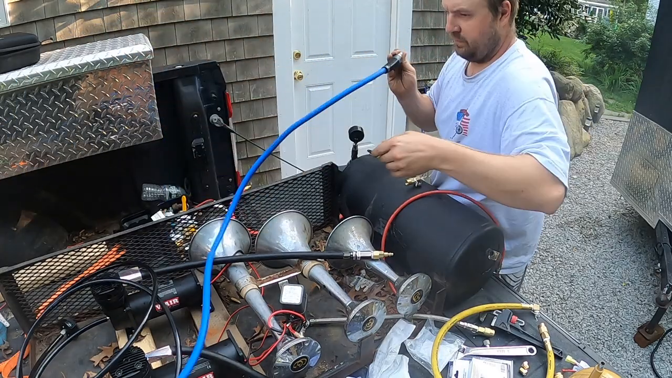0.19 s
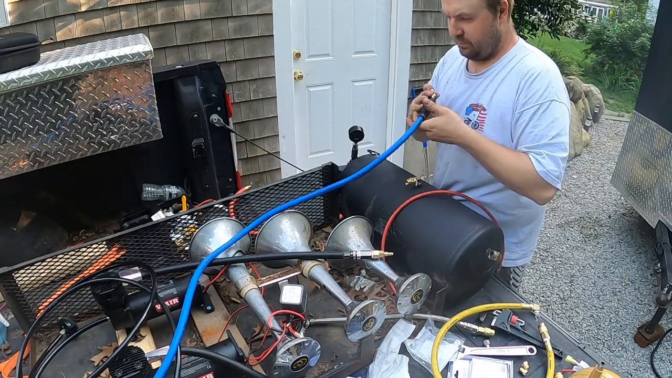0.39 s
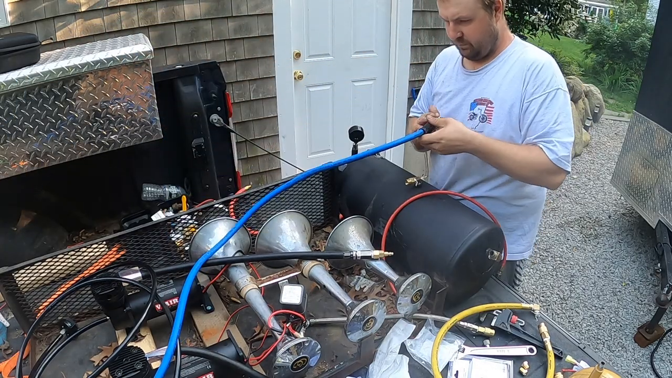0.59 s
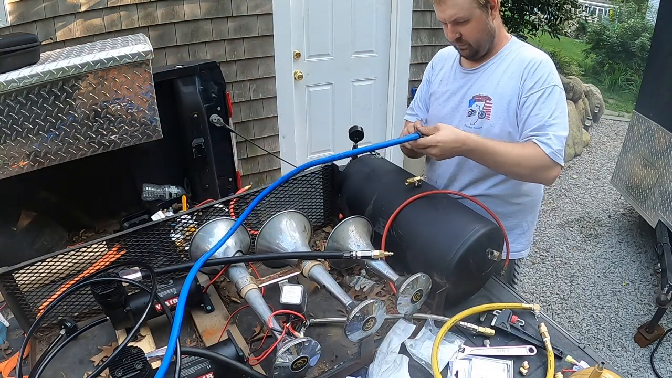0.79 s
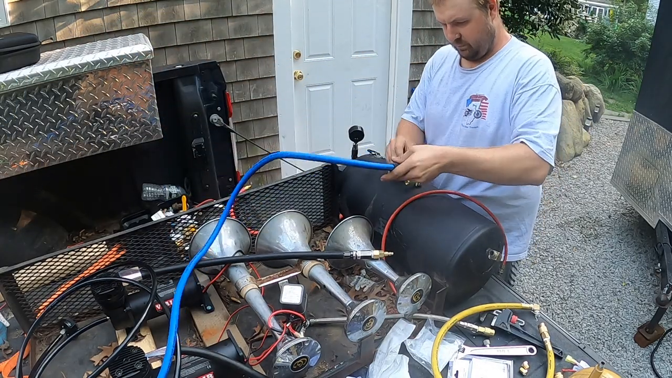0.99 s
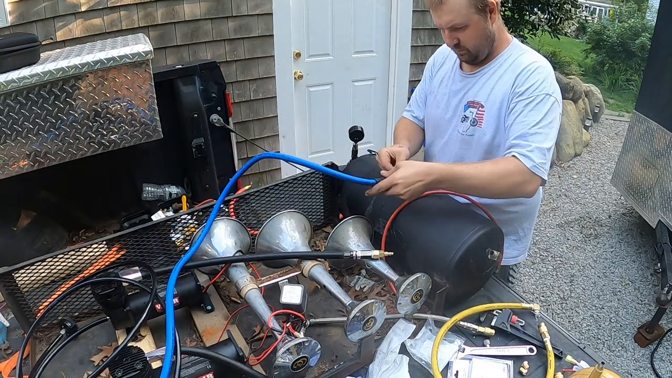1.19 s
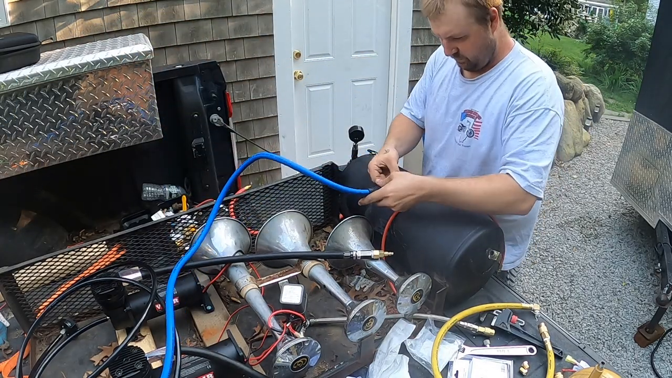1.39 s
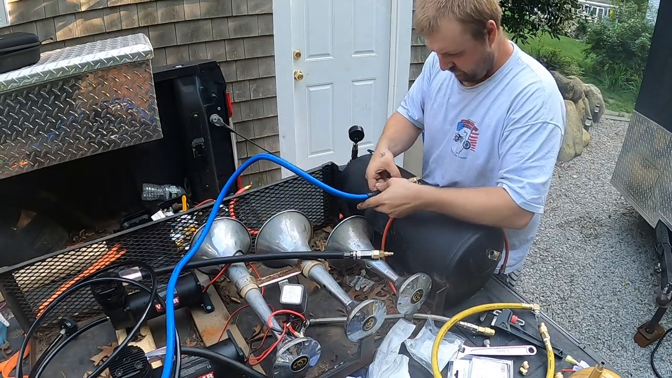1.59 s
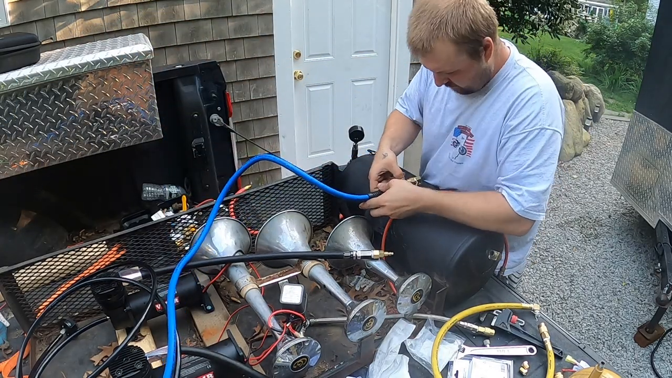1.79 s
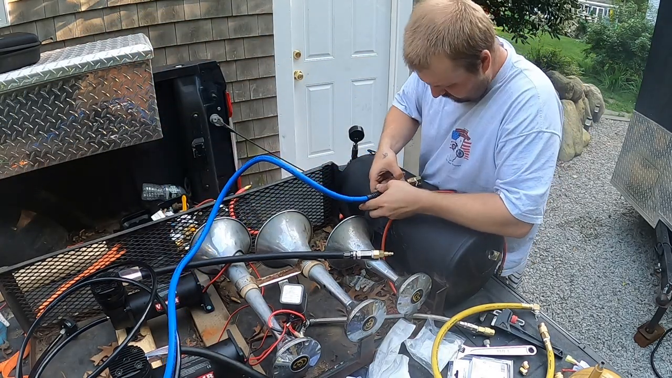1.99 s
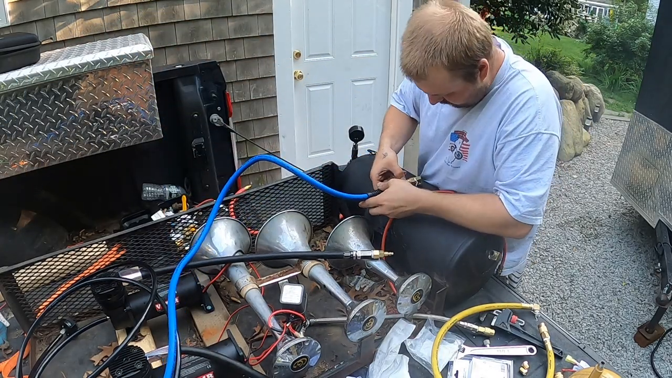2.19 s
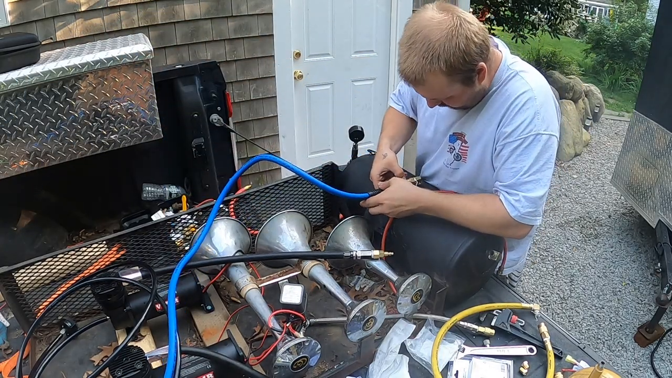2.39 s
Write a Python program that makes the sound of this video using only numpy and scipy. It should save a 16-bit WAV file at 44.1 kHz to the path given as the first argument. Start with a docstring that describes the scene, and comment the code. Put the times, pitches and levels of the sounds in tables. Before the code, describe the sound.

An air hose drops onto a truck bed, its brass fittings clattering, with one loud thump and a fading low steel hum. A coupler then clicks twice against a tank and grates briefly. Outdoors, nearby, with faint insects.

```python
"""Air hose on a truck bed

Outdoors beside a house wall, on two closely spaced microphone ports. An air hose is dragged over a
truck bed: its brass fittings clatter, it lands with a thump, and the steel hums low. The coupler clicks
twice against a steel tank, then its thread grates as it is turned. Behind it, insects and a far bird."""
import sys
import numpy as np
from scipy import signal
from scipy.fft import rfft, irfft
from scipy.io import wavfile
from scipy.ndimage import uniform_filter1d

SR = 44100
rng = np.random.default_rng(int(sys.argv[2]) if len(sys.argv) > 2 else 0)


def master(y):
    """Save y as 16-bit WAV."""
    cut = np.clip(np.atleast_2d(y).T, -1, 1)
    pcm = np.round(cut * 32767)  # scale
    wavfile.write(sys.argv[1], SR, pcm.astype(np.int16))


N = 110250
TIME = np.arange(N) / SR


# fittings bouncing on the bed (time [s], knock level [dB], tick level [dB])
BOUNCES = [(0.1991, -28.5, -26.5), (0.2042, -30.5, -27.5), (0.2101, -24.5, -21), (.2128, -20, -28.5),
           (0.2238, -28.5, -31.5), (0.2272, -15, -47), (.2365, -21.5, -44.5), (.2565, -23.5, -30),
           (.2855, -30, -39.5), (0.2942, -27.5, -33), (0.2992, -29.5, -33), (.3285, -31, -38.5),
           (0.453, -43, -54.5), (0.527, -35, -52.5), (.978, -59, -82.5)]
# spectra of the knock, the brass tick and the stirred bed (frequency [Hz], level [dB])
KNOCK_COLOUR = [(150, -24.5), (400, -6.5), (800, -3.5), (1200, -0.5), (1800, 1), (2600, -5), (3700, -3.5),
                (4600, -54.5), (8000, -48.5), (14000, -124)]
TICK_COLOUR = [(1500, -17.5), (3700, 7.5), (4800, -2), (7000, -5.5), (9000, -10.5), (12800, -13),
               (14200, -27), (15500, -40)]
BED_COLOUR = [(40, 1), (180, 0), (300, -6), (600, -6), (1800, -17), (3600, -30.5), (4600, -47),
              (6500, -65.5), (10000, -85)]

def clatter():
    """Each bounce is a knock and a bright tick, and stirs the bed; the bounces add in power."""
    knocks = ticks = tails = 0
    for start, knock_db, tick_db in BOUNCES:
        knocks += (amp(knock_db) * fade(start, t60=0.06)) ** 2
        for stage_db, t60 in [(6, .005), (0, .031), (-11.5, .085)]:  # sharp contact, tick, jingle
            ticks += (amp(tick_db + stage_db) * fade(start, t60)) ** 2
        tails += (amp(knock_db - 4.5) * fade(start, t60=.36, rise=0.019)) ** 2
    return (np.sqrt(knocks) * noise(KNOCK_COLOUR) + np.sqrt(ticks) * noise(TICK_COLOUR)
            + np.sqrt(tails) * noise(BED_COLOUR))


# spectra of the landing (frequency [Hz], level [dB])
CRACK_COLOUR = [(150, -19), (387, -3), (600, -7), (828, 0), (1210, -5.5), (2400, -12.5), (3710, -21),
                (4570, -47), (14000, -88)]
BOOM_COLOUR = [(60, -14.5), (120, -7), (250, -11), (500, -11.5), (800, -11), (1400, -15), (2500, -35),
               (5000, -66.5), (12000, -92)]
# panel modes of the bed (frequency [Hz], level [dB], t60 [s])
PANEL_MODES = [(122, -24, .55), (157, -26, .6), (259, -30, .65), (340, -33, .6), (450, -33, .55),
               (657, -30, .35), (790, -29, .3), (857, -30, .38), (1133, -35, .5), (1404, -33, .35)]

def thump(start=.343, thud_start=.3588):
    """The heavy landing on the bed: a hard strike and crack, a boom, a low thud and ringing panels."""
    strike = amp(3) * struck_tone(start, hz=1632, t60=0.0046)
    crack = amp(-7.5) * fade(start, t60=0.065) * noise(CRACK_COLOUR)
    boom = amp(-17.5) * fade(start, t60=.13, rise=0.007) * noise(BOOM_COLOUR)
    tail = amp(-23) * fade(start, t60=.5, rise=0.0033) * noise(BED_COLOUR)
    thud = amp(-3) * struck_tone(thud_start, hz=86, t60=0.067, rise=0.0065)
    panels = amp(-1.5) * ring(start, PANEL_MODES)
    return strike + crack + boom + tail + thud + panels


# level of the deep rumble (time [s], level [dB])
RUMBLE_LEVEL = [(0, -51), (.21, -50), (.25, -35), (.34, -32), (.5, -42), (.65, -34), (.9, -39), (1.15, -43),
                (1.3, -34), (1.6, -47), (1.9, -54), (2.5, -51)]
# its spectrum (frequency [Hz], level [dB])
RUMBLE_COLOUR = [(12, -20), (24, -3), (31, 0), (42, -10), (90, -20), (200, -40), (8000, -130)]

def hum():
    """The lowest mode of the steel hums on over a deep rumble, mostly in the right port."""
    tone = amp(-7.5) * struck_tone(.3578, hz=81, t60=1.68, rise=0.039)
    rumble_gain = amp(4.5) * envelope(RUMBLE_LEVEL)
    left = amp(-18) * tone + amp(-10) * rumble_gain * noise(RUMBLE_COLOUR)
    right = tone + rumble_gain * noise(RUMBLE_COLOUR)
    return np.array([left, right])


# contacts as the coupler taps the tank, then snaps home (time [s], level [dB])
TAP_CONTACTS = [(1.2058, -32), (1.214, -38.5)]
SNAP_CONTACTS = [(1.9079, -27), (1.9094, -15), (1.9133, -29), (1.9166, -26)]
# their spectra (frequency [Hz], level [dB])
TAP_SPECTRUM = [(240, -40), (400, -2), (694, -16), (1260, -10), (1400, -19), (1640, 4), (1800, -12),
                (1940, -2), (2280, -8.5), (3160, -3), (4200, -13.5), (9230, -34), (14000, -58)]
SNAP_SPECTRUM = [(180, -38), (649, -20), (1150, -17), (1340, 5), (1470, -16), (2100, -6), (3240, -0.5),
                 (3460, -1), (3750, 0.5), (4400, -4), (7240, -29), (14000, -86)]
# modes of tank and coupler (frequency [Hz], level [dB], t60 [s])
TANK_MODES = [(106, -41, .7), (248, -32, .38), (371, -45, .36), (813, -45, .16), (1620, -38, .1),
              (1685, -37, .2), (2681, -43, .14), (3149, -33, .11), (3400, -49, .2)]
COUPLER_MODES = [(665, -48, .18), (970, -48, .15), (1335, -45, .17), (1620, -36, .13), (1986, -48, .22),
                 (2272, -39, .14), (2439, -44, .13), (2589, -39, .1), (3182, -40, .2), (3290, -39, .23),
                 (3677, -40, .14), (3833, -30, .08)]

def coupler():
    """A tap rings the tank; the snap rings the coupler, whose brass sleeve pings at each contact."""
    tap = click(TAP_CONTACTS, TAP_SPECTRUM, TANK_MODES, t60=0.055, tail_db=-2.5, tail_t60=0.1)
    snap = click(SNAP_CONTACTS, SNAP_SPECTRUM, COUPLER_MODES, t60=.01, tail_db=-16.5, tail_t60=.13)
    ping = sum(amp(db + 7) * struck_tone(start, hz=3800, t60=.007, rise=.0005)
               for start, db in SNAP_CONTACTS)
    return tap + snap + ping


def click(contacts, colour, modes, t60, tail_db, tail_t60):
    """Metal contacts in quick succession, with a dense ringing tail and a few clear modes."""
    power = 0
    for start, db in contacts:
        power += (amp(db) * fade(start, t60)) ** 2
        power += (amp(db + tail_db) * fade(start, tail_t60, rise=0.00064)) ** 2
    return np.sqrt(power) * noise(colour) + ring(contacts[0][0], modes)


# touches on the tank (time [s], level [dB])
TANK_TOUCHES = [(1.211, -37), (1.914, -45), (2.305, -45)]
# spectrum of its shell (frequency [Hz], level [dB])
SHELL_COLOUR = [(50, -2.5), (200, 1), (280, -14.5), (430, -9.5), (650, -20), (1200, -19.5), (3000, -60)]

def tank_shell():
    """The tank answers each touch with a dull knock."""
    knocks = sum(amp(db) * fade(start, t60=0.33, rise=0.014) for start, db in TANK_TOUCHES)
    return knocks * noise(SHELL_COLOUR)


# jerks of the thread (peak time [s], rise [s], fall [s], level [dB], stick-slip level [dB],
# rasp frequency [Hz], rasp level [dB])
THREAD_JERKS = [(2.062, 0.048, 0.034, -55.5, -2, 3370, 4.5), (2.289, 0.0061, 0.0052, -40, -22, 4030, -4.5),
                (2.303, 0.0024, 0.0041, -40.5, -12, 2960, 1), (2.310, 0.0052, 0.013, -33, -5.5, 2850, -5.5),
                (2.365, 0.00099, .007, -43.5, -18, 3250, -4), (2.37, 0.001, 0.014, -43, -14.5, 1350, 5)]
# resonances of the turning fitting (frequency [Hz], width [Hz], level [dB])
FITTING_RESONANCES = [(660, 48, 3), (1325, 55, 3), (1630, 50, 0), (1795, 70, -1.5), (2650, 300, -9),
                      (3240, 110, -7)]

def thread(slip_hz=654.4):
    """The thread catches in jerks: grainy friction and stick-slip pulses ring the hand-damped fitting."""
    cycles = np.cumsum(slip_hz * (1 + 0.01 * wander(samples=100))) / SR
    slips = unit(np.diff(np.floor(cycles), prepend=0) - slip_hz / SR)  # one pulse a cycle
    lowpass = signal.butter(6, 4400, fs=SR, output="sos")
    out = 0
    for peak, rise, fall, db, slip_db, rasp_hz, rasp_db in THREAD_JERKS:
        grains = rng.standard_normal(N) * amp(1.5 * wander(samples=30))
        jerk = np.exp(-np.maximum((peak - TIME) / rise, (TIME - peak) / fall))
        friction = (grains + amp(slip_db) * slips) * jerk
        fitting = sum(amp(level) * resonate(friction, hz, width) for hz, width, level in FITTING_RESONANCES)
        rasp = amp(rasp_db) * resonate(friction, rasp_hz, width_hz=360)
        grate = signal.sosfilt(lowpass, amp(-22.5) * friction + fitting + rasp)
        grate += amp(-53) * friction  # a trace of treble sparkle
        peak_rms = np.sqrt(uniform_filter1d(grate ** 2, size=400).max())
        out += amp(db) * grate / peak_rms
    return out


# slides of the hose (peak time [s], width [s], pitch at the peak [Hz], level [dB])
HOSE_SLIDES = [(0.013, .016, 3426, -51), (.111, 0.013, 3372, -50)]
# spectrum of rubbing rubber (frequency [Hz], level [dB])
RUB_COLOUR = [(200, -23), (1100, 7.5), (2500, -12), (3600, 6.5), (4500, -26.5), (9000, -20), (14000, -45.5)]

def hose(octaves_per_s=10):
    """Rubber slides over an edge: a rub with a rising zip."""
    out = 0
    for peak, width, hz, db in HOSE_SLIDES:
        pitch = hz * 2 ** np.clip(octaves_per_s * (TIME - peak), -.25, .25)
        zip_tone = amp(db) * swell(peak, width) * glide(pitch)
        rub = amp(-54) * swell(peak + 0.01, 2.3 * width) * noise(RUB_COLOUR)
        out += zip_tone + rub
    return out


# brushes of sleeve and hands (peak time [s], width [s], level [dB])
BRUSHES = [(.6, 0.13, -72.5), (1.17, 0.029, -78)]
# their spectrum (frequency [Hz], level [dB])
BRUSH_COLOUR = [(800, -15), (3000, 1.5), (4500, -8.5), (9000, -5), (15000, -36)]

def rustle():
    """Cloth and skin brush softly."""
    return sum(amp(db) * swell(peak, width) for peak, width, db in BRUSHES) * noise(BRUSH_COLOUR)


# spectrum of the yard's murmur (frequency [Hz], level [dB])
MURMUR_COLOUR = [(35, -28.5), (60, -5), (100, -12), (180, -18.5), (320, -24.5), (450, -24), (620, -31),
                 (950, -24), (1300, -26.5), (1900, -29.5), (2700, -36), (4000, -33.5), (5100, -31),
                 (6100, -46.5), (9500, -59.5), (15000, -81)]
# level of the background murmur, ducking after the thump and slowly recovering (time [s], level [dB])
MURMUR_DUCKING = [(0, -54.5), (.75, -61), (.98, -62.5), (1.25, -59.5), (1.6, -57), (2.5, -55.5)]

def yard():
    """Outdoor murmur around the microphone, narrow in the bass and wide in the treble."""
    width = gains([(100, -15.5), (400, -7.5), (1400, -6), (3000, -2.5), (8000, 2.5)])
    side = irfft(rfft(noise(MURMUR_COLOUR)) * width, N)
    return (noise(MURMUR_COLOUR) + np.array([side, -side])) * envelope(MURMUR_DUCKING)


# band of the insects (frequency [Hz], level [dB])
INSECT_BAND = [(3000, -9.5), (4300, -22), (5200, 16.5), (5600, -1.5), (6100, -37.5)]

def insects():
    """Insects make a steady high hiss on both sides."""
    return amp(-74) * np.array([noise(INSECT_BAND), noise(INSECT_BAND)])


# partials of the whine (frequency [Hz], level [dB])
WHINE_PARTIALS = [(966, -5), (1933, 0)]
# its level (time [s], level [dB])
WHINE_LEVEL = [(0, -79), (.7, -75), (1.05, -81), (1.35, -74), (1.48, -78), (1.65, -70), (1.78, -77),
               (2.2, -75), (2.5, -71)]

def whine():
    """A faint background whine wavers in pitch and level."""
    drift = 1 + 0.0023 * wander(samples=1500)
    tone = sum(amp(db) * glide(hz * drift) for hz, db in WHINE_PARTIALS)
    waver = amp(2.5 * wander(samples=1800))
    return envelope(WHINE_LEVEL) * waver * tone


def bird(peak=1.56, hz=8420, sag_hz_per_s=1100):
    """Far off, one thin, unsteady bird note sags in pitch."""
    pitch = hz - sag_hz_per_s * (TIME - peak) + 90 * wander(samples=100)
    return amp(-76) * swell(peak, width=.07) * glide(pitch)


# spectrum of the echo off wall and truck (frequency [Hz], level [dB])
ECHO_COLOUR = [(100, 6.5), (800, -14), (2000, -1.5), (4000, 0.5), (8000, -3), (15000, -9)]
# balance of the microphone ports (frequency [Hz], left minus right [dB])
PORT_TILT = [(60, 4), (200, -2), (600, 0), (1300, -1.5), (2400, 4.5), (4200, 4), (6000, -8.5),
             (8100, -13.5), (15000, -5.5)]

def ports(source, left_lag_s=6e-5):
    """Sound reaches the right port first; wall and truck add a short echo; each port has its own colour."""
    tails = [noise(ECHO_COLOUR) * fade(0.0015, t60=.17) for _ in range(2)]
    echo = np.array([signal.fftconvolve(source, tail / np.linalg.norm(tail))[:N] for tail in tails])
    lag = np.exp(-2j * np.pi * np.fft.rfftfreq(N, 1 / SR) * left_lag_s)
    direct = np.array([rfft(source) * lag, rfft(source)])
    tilt = np.sqrt(gains(PORT_TILT))
    return irfft((direct + amp(-11.5) * rfft(echo)) * np.array([tilt, 1 / tilt]), N)


def amp(db):
    """Decibels to gain."""
    return 10 ** (np.asarray(db) / 20)


def unit(x):
    """Scale to rms 1."""
    return x / np.sqrt(np.mean(x ** 2))


def gains(points):
    """Gain at each frequency from (frequency [Hz], level [dB]) points."""
    hz, db = np.array(points).T
    return amp(np.interp(np.log(np.fft.rfftfreq(N, 1 / SR) + 1), np.log(hz), db))


def envelope(points):
    """Gain at each sample from (time [s], level [dB]) points."""
    return amp(np.interp(TIME, *np.array(points).T))


def noise(colour):
    """Coloured noise of rms 1."""
    return unit(irfft(rfft(rng.standard_normal(N)) * gains(colour), N))


def wander(samples):
    """Random drift of rms 1, smoothed over so many samples."""
    return unit(uniform_filter1d(rng.standard_normal(N), size=samples))


def fade(start, t60, rise=0.00024):
    """Quick rise, then a decay of 60 dB in t60 seconds."""
    age = np.maximum(TIME - start, 0)
    return (1 - np.exp(-age / rise)) * np.exp(-np.log(1000) * age / t60)


def swell(peak, width):
    """Bell-shaped envelope."""
    return np.exp(-.5 * ((TIME - peak) / width) ** 2)


def glide(hz):
    """A sine that follows a changing pitch."""
    return np.sin(2 * np.pi * np.cumsum(hz) / SR)


def struck_tone(start, hz, t60, rise=0.00024):
    """One decaying sine."""
    return fade(start, t60, rise) * np.sin(2 * np.pi * hz * (TIME - start))


def ring(start, modes):
    """Struck modes dying away, each at a random phase."""
    return sum(amp(db) * fade(start, t60, rise=0.0023) * np.sin(2 * np.pi * (hz * TIME + rng.random()))
               for hz, db, t60 in modes)


def resonate(x, hz, width_hz):
    """One resonance, gain 1 at its centre."""
    return signal.lfilter(*signal.iirpeak(hz, hz / width_hz, fs=SR), x)


def scene():
    """The handling as it reaches the two ports, over the steel's hum and the yard."""
    handling = clatter() + thump() + coupler() + tank_shell() + thread() + hose() + rustle()
    return ports(handling) + hum() + yard() + insects() + whine() + bird()


def record(dry, top_hz=14900):
    """The recorder rounds the highest peaks and cuts the top."""
    rounded = dry / (1 + dry ** 6) ** (1 / 6)
    return signal.sosfilt(signal.ellip(8, .2, 70, top_hz, fs=SR, output="sos"), rounded)


dry = scene()
out = record(dry)
master(out)
```